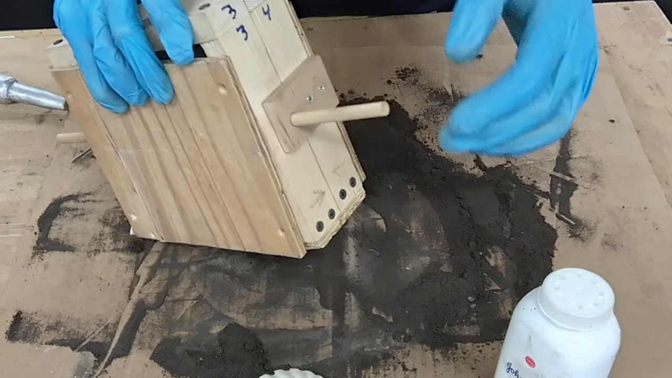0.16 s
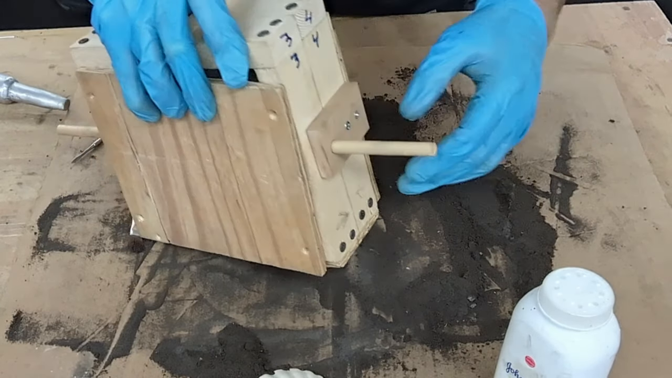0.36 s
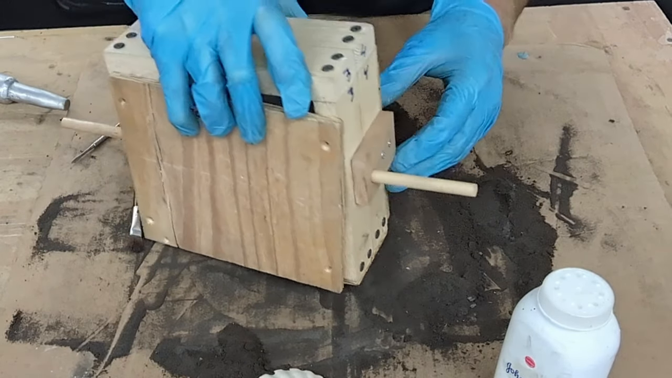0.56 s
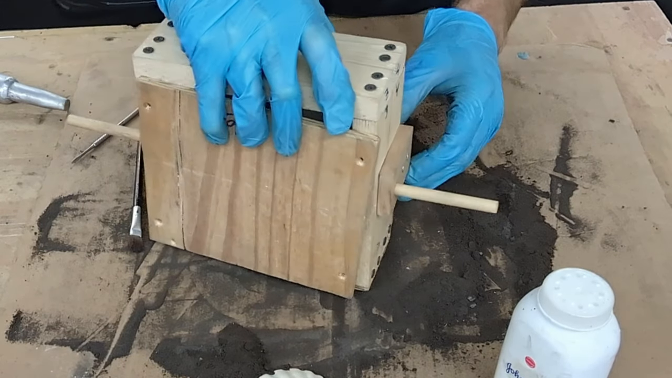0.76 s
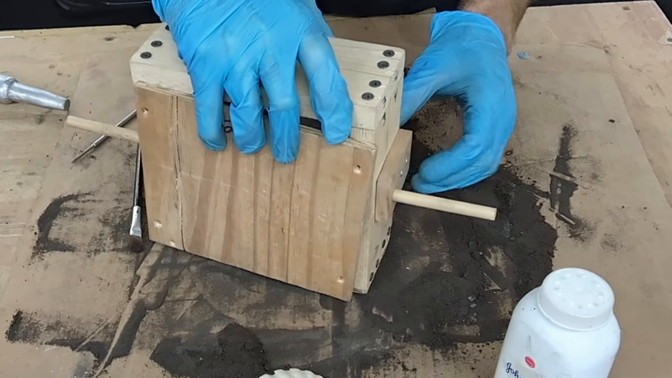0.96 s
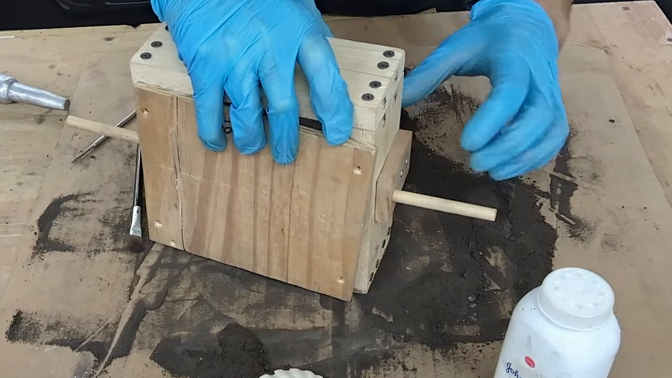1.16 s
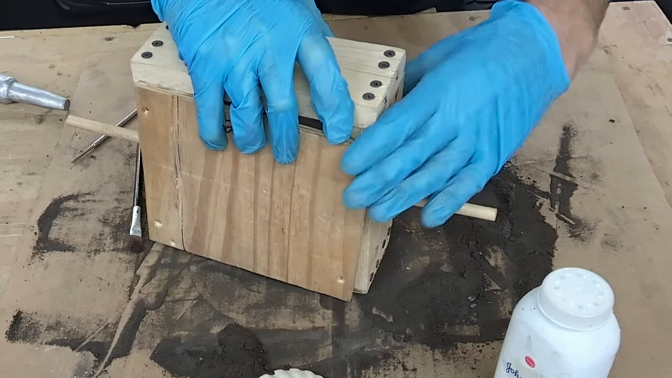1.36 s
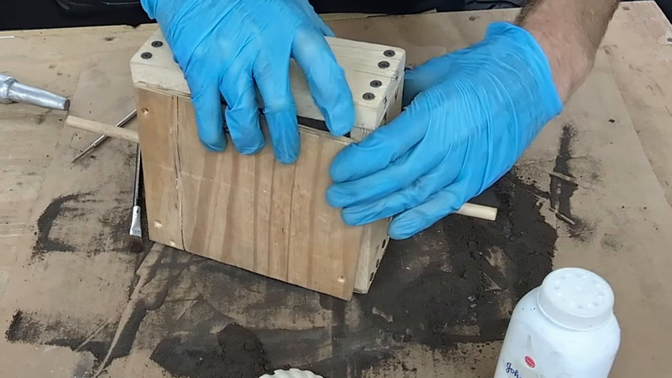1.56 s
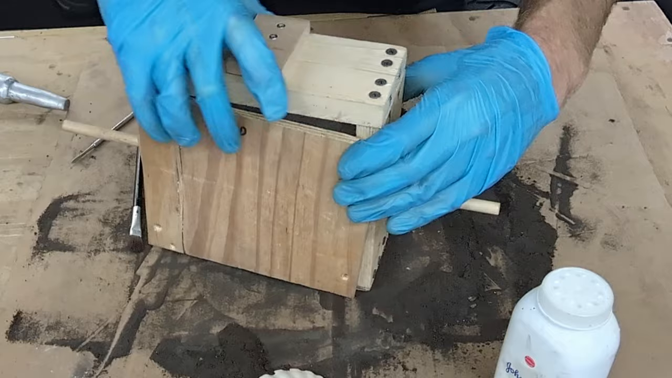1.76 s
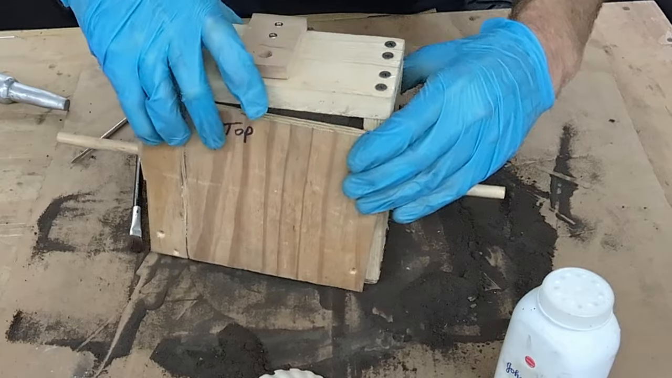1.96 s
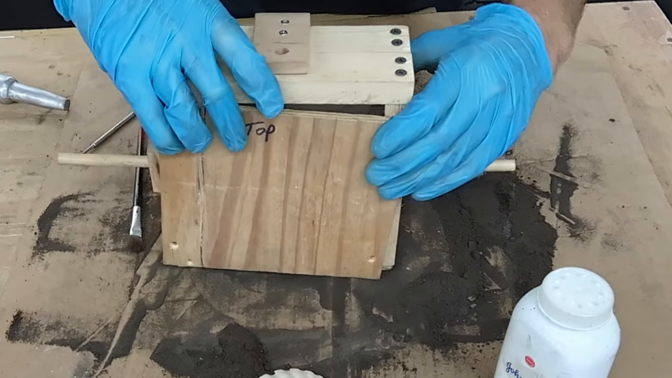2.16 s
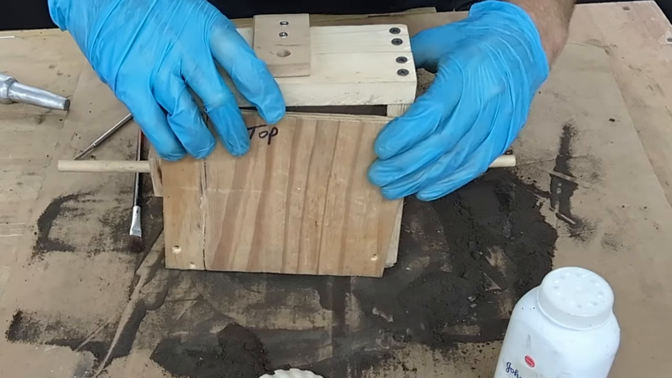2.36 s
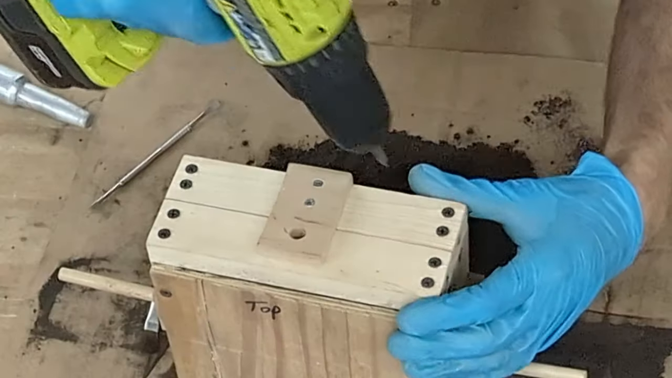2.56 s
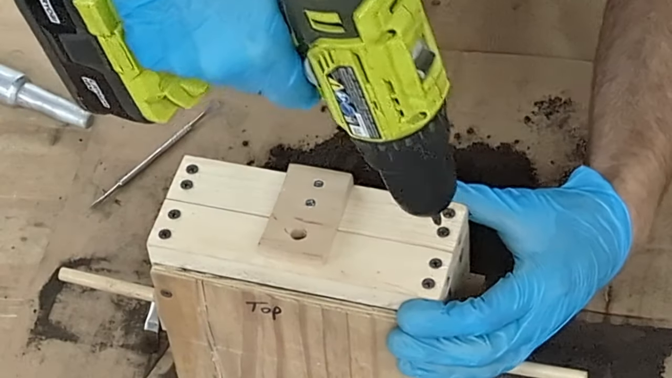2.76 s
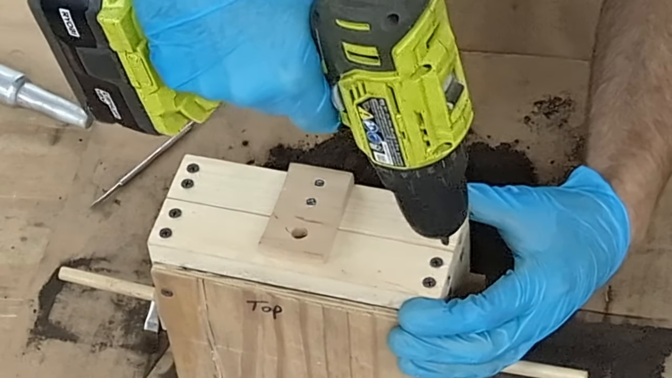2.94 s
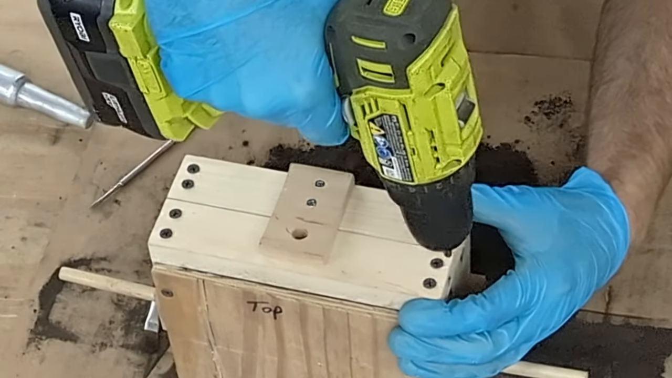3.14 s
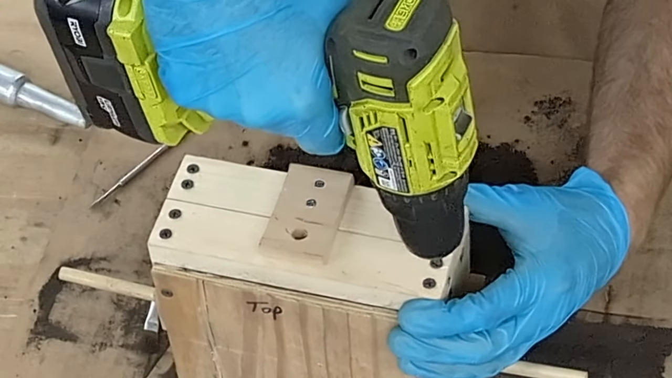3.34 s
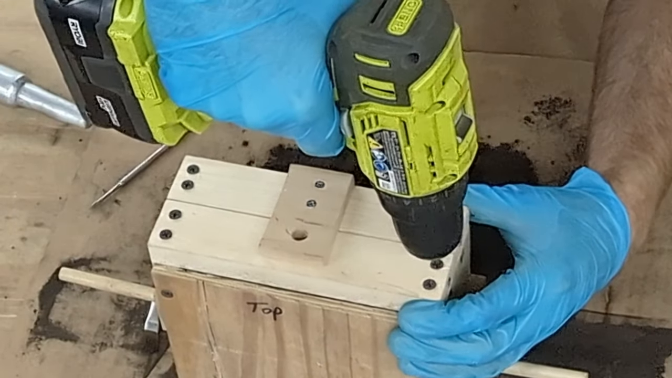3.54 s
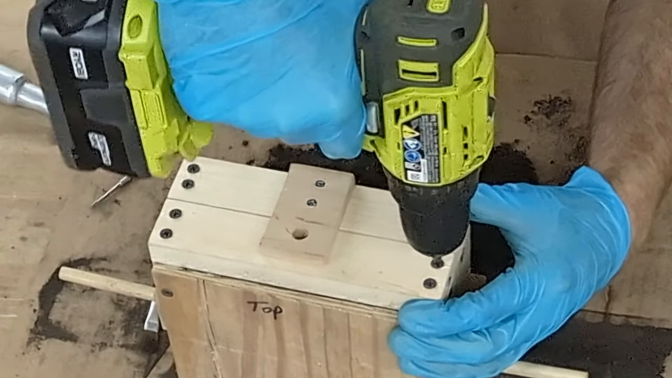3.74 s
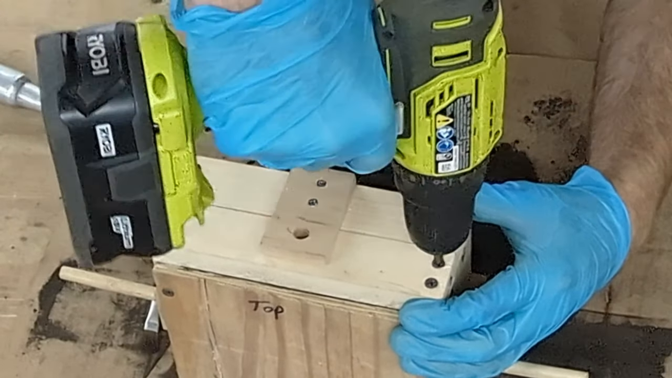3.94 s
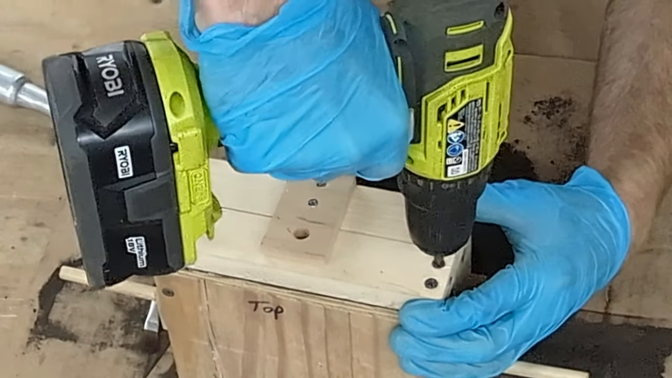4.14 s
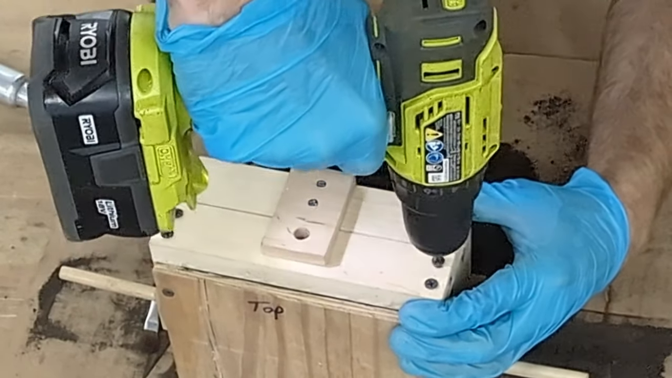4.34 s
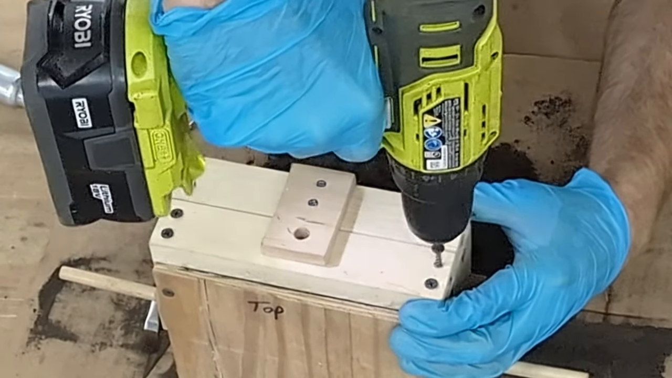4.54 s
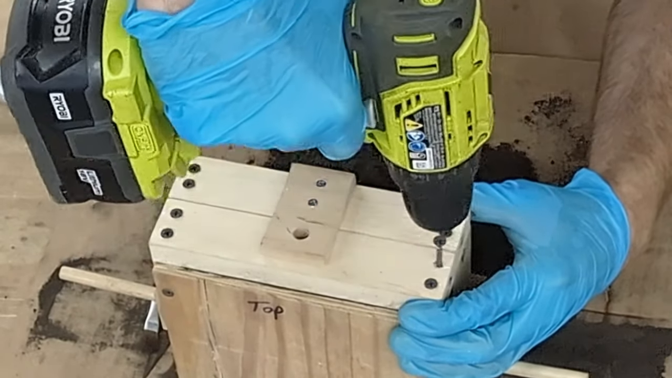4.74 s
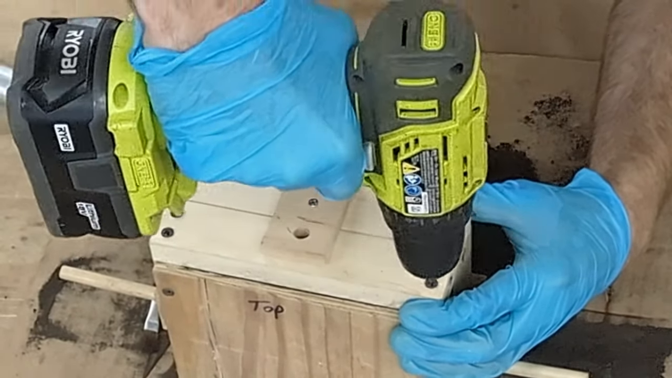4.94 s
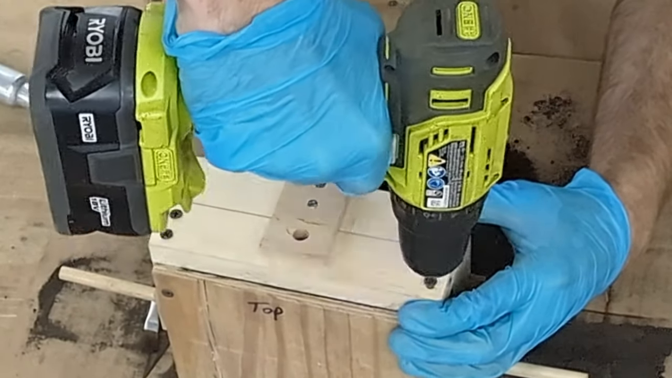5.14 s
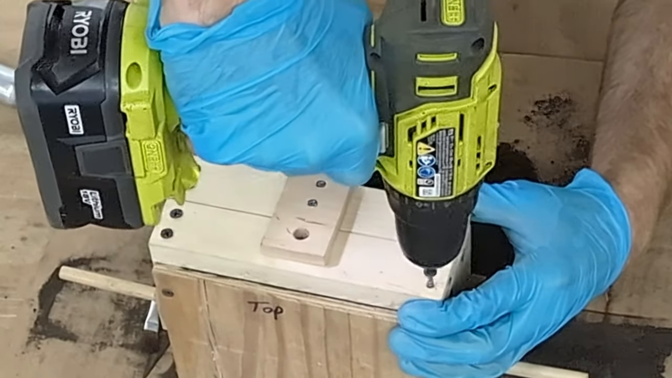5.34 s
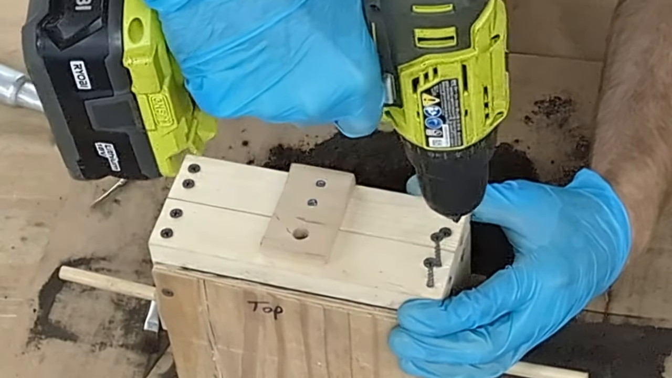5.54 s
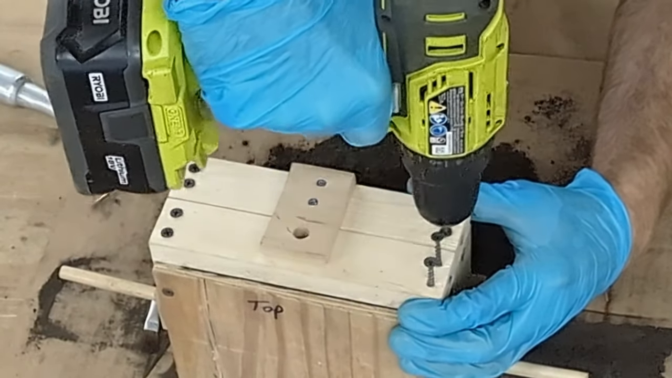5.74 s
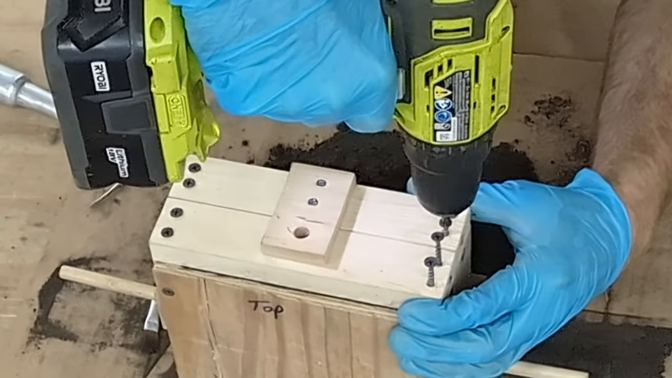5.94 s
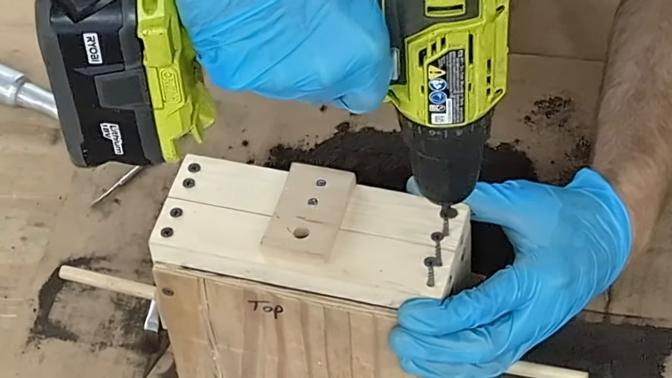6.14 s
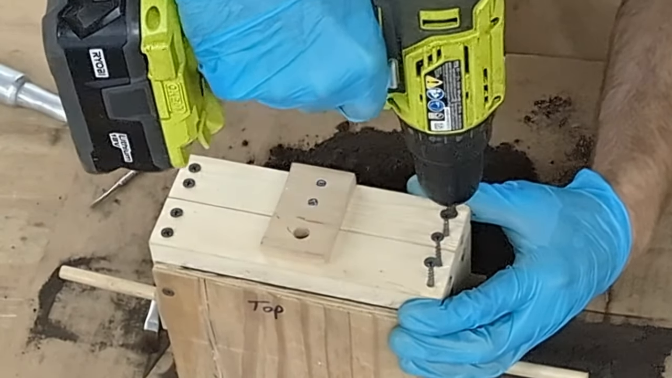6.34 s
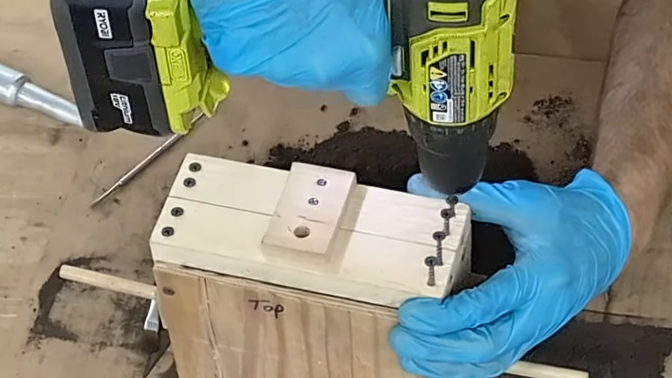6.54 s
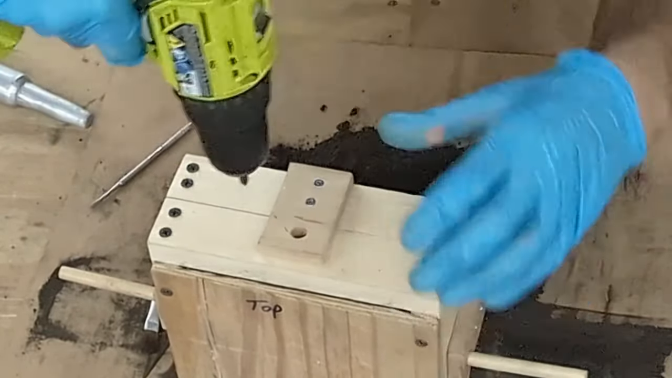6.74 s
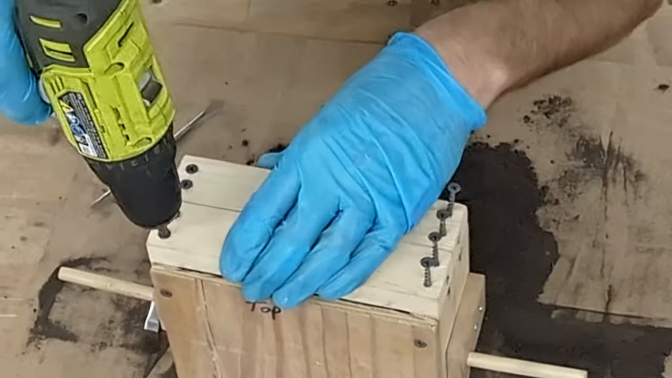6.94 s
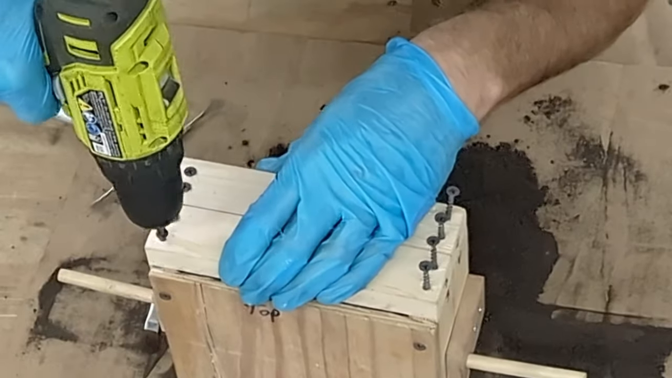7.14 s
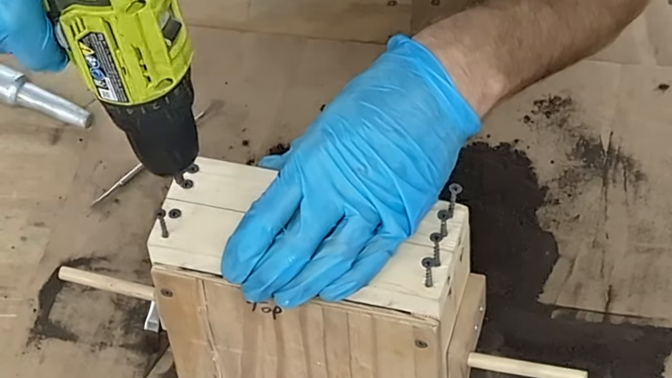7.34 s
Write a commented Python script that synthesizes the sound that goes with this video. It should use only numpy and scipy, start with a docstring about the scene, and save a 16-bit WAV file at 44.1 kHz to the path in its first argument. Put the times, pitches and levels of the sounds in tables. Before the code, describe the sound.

Gloved hands turn a hollow wooden box on a workshop bench with faint rustles, scrapes, ticks and soft knocks over low rumble and a distant hum. After sharper knocks and a thin trigger squeak, a cordless drill backs out screws in short rasping bursts with a high whine, the bit clacking into screw heads and the box booming. Close stereo microphone in a quiet, dry indoor space.

```python
"""First, gloved hands turn a hollow wooden box on a workshop bench: shaped noise rustles, scrapes and ticks,
knocks ring panel modes, over low rumble, a far machine's hum and faint air. Then a thin squeak at the trigger,
and a cordless drill backs screws out in short bursts: jolted noise rasps through housing resonances, gear tones
rise, the speed control whines beside its switching rate. Between and during the bursts the bit knocks into the
screw heads, and shuddering notes and struck modes make the box boom along."""
import sys
import numpy as np
from scipy import signal
from scipy.fft import rfft, irfft
from scipy.io import wavfile
from scipy.ndimage import uniform_filter1d

SR = 44100
rng = np.random.default_rng(int(sys.argv[2]) if len(sys.argv) > 2 else 0)


def unload_audio(sound):
    """Save the sound as a 16-bit wav file, at the path given as the first command line argument."""
    columns = np.transpose(np.atleast_2d(sound))
    # keep every value between -1 and 1, then stretch to whole-number steps
    steps = np.round(np.clip(columns, -1, 1) * 32767)
    wavfile.write(sys.argv[1], SR, steps.astype(np.int16))


N = 330353
T = np.arange(N) / SR
STEPS = T[::16]  # control times [s]


def gain_of(db):
    """Amplitude ratio of a level in dB."""
    return 10 ** (np.asarray(db) / 20)


def evened(x):
    """Scale to rms 1."""
    return x / np.sqrt(np.mean(x ** 2) + 1e-20)


def read(points, hz):
    """Curve through (frequency, value) points, linear over log frequency."""
    f, value = np.transpose(points)
    return np.interp(np.log(hz + 1), np.log(f + 1), value)


def track(table, axis, silent=None):
    """One table column over time; outside the table it holds, or takes the silent value."""
    s, value = np.array(table)[:, [0, axis]].T
    out = np.interp(T, s, value)
    if silent is None:
        return out
    inside = (T >= s[0]) & (T <= s[-1])
    return uniform_filter1d(np.where(inside, out, silent), size=300)


def smooth(control):
    """Control interpolated from STEPS to every sample."""
    return np.interp(T, STEPS, control)


def swell(s, rise_s, fade_s):
    """Gain that climbs 20 dB in rise_s up to the moment s and drops 20 dB in fade_s."""
    return gain_of(-20 * np.maximum((s - STEPS) / rise_s, (STEPS - s) / fade_s))


def bell(s, width_s):
    """Gaussian bump, peak 1, down to 1/e at width_s on either side."""
    return np.exp(-((STEPS - s) / width_s) ** 2)


def wobble(size):
    """Slow random curve of rms 1, smoothed twice over size samples."""
    return evened(uniform_filter1d(uniform_filter1d(rng.standard_normal(N), size), size))


def grit(per_s, spread_db, size):
    """Gain that jumps up at random instants and decays with a time constant of size samples."""
    jump = gain_of(spread_db * np.minimum(rng.exponential(1, N), 4))
    hits = (rng.random(N) < per_s / SR) * jump
    return 1 + signal.oaconvolve(hits, np.exp(-np.arange(4 * size) / size))[:N]


def resonate(x, hz, width_hz):
    """One resonance of gain 1: shift hz to zero, low-pass, shift back."""
    turn = np.exp(2j * np.pi * np.cumsum(hz * np.ones(N)) / SR)
    r = np.exp(-np.pi * width_hz / SR)
    return 2 * (turn * signal.lfilter([1 - r], [1, -r], x / turn)).real


# left-right likeness of noise: (frequency [Hz], correlation [0-1])
NOISE_LIKENESS = [(60, 0.9), (150, 0.94), (380, 0.69), (950, 0.18), (2400, 0.019), (15000, 0.014)]


def noise(shape, patchy_db, size=512):
    """Two-channel noise of a given spectrum with drifting patches, rms 1."""
    frames, hz = 4 * N // size + 5, np.fft.rfftfreq(size, 1 / SR)
    a, b, c, d, patches = rng.standard_normal((frames, len(hz), 5)).T
    patches = uniform_filter1d(patches, size=6, axis=0)
    patches = evened(uniform_filter1d(patches, size=10, axis=1))
    same = np.clip(read(NOISE_LIKENESS, hz), -1, 1)[:, None]
    left = a + 1j * b
    right = same * left + np.sqrt(1 - same ** 2) * (c + 1j * d)
    spectra = np.array([left, right]) * gain_of(read(shape, hz)[:, None] + patchy_db * patches)
    return evened(signal.istft(spectra, nperseg=size, noverlap=size * 3 // 4)[1][:, :N])


def sine(turns, offset_turns):
    """Sine of rms 1, second channel ahead by offset_turns."""
    return np.sqrt(2) * np.sin(2 * np.pi * (turns + np.array([[0], [offset_turns]])))


def tone(hz, waver_hz):
    """Slightly unsteady sine of rms 1, channels a quarter turn apart."""
    turns = np.cumsum(hz + waver_hz * wobble(size=300)) / SR + rng.random()
    return sine(turns, 1 / 4)


def add(mix, s, sound):
    """Add a sound into the mix at s seconds, cut at the end."""
    part = mix[:, max(round(s * SR), 0):][:, :sound.shape[1]]
    part += sound[:, :part.shape[1]]


def aftermath(t60_s):
    """Gain that follows every knock's boom and dies 60 dB in t60_s times its ring factor."""
    most_db = -38  # harder knocks leave no more
    return smooth(sum(gain_of(min(boom_db, most_db)) * swell(s + BOOM_DELAY_S, .02, stretch * t60_s / 3)
                      for s, _, boom_db, _, stretch, _ in KNOCK_HITS))


# rumble level before random swells: (time [s], level [dB])
RUMBLE_LEVEL = [(0.0, -57), (0.44, -60), (1.6, -57), (1.94, -62), (2.7, -64), (3.3, -67), (3.48, -58),
                (3.73, -69), (4.04, -59), (4.28, -60), (4.45, -93), (4.7, -89.5), (4.79, -74), (4.85, -103),
                (5.1, -76.5), (5.9, -73.5), (6.7, -78), (7.49, -87)]
# rumble spectrum: (frequency [Hz], relative density [dB per Hz])
RUMBLE_SPECTRUM = [(12, -45), (20, -30), (56, 4.5), (80, -7), (123, -17.5), (186, -24), (236, -34),
                   (258, -29), (327, -36), (400, -33), (520, -85.5), (880, -120)]
RUMBLE_SWELL_DB, THUMP_DB, THUMP_T60_S = 3.8, -21, .15  # thump relative to the capped boom


def rumble():
    """Low noise in random swells; each knock also thumps the bench."""
    lumps = noise(RUMBLE_SPECTRUM, patchy_db=1., size=2048)
    level = gain_of(track(RUMBLE_LEVEL, axis=1) + RUMBLE_SWELL_DB * wobble(size=2000))
    return lumps * (level + gain_of(THUMP_DB) * aftermath(THUMP_T60_S))


# far machine: (time [s], stroke rate [Hz], multiple 2 [dB], multiple 3 [dB])
HUM_STROKES = [(0.0, 25.62, -74.5, -55), (0.4, 25.48, -74, -56), (0.6, 24.92, -74, -58),
               (0.72, 25.3, -79, -62), (1.33, 24.71, -67, -51.5), (1.7, 24.84, -50.5, -61),
               (1.99, 24.86, -71, -85), (2.4, 25, -72, -66), (2.48, 24.9, -64.5, -64),
               (2.52, 24.9, -80, -81)]
# higher multiples, mean level: (multiple of stroke rate, level [dB])
HUM_MULTIPLES = [(5, -73.5), (7, -82.5)]


def far_hum():
    """Far machine: sines at multiples of a drifting stroke rate."""
    stroke = np.cumsum(track(HUM_STROKES, axis=1)) / SR
    heard = T < HUM_STROKES[-1][0]
    levels = [(k, gain_of(track(HUM_STROKES, axis=k, silent=-120))) for k in (2, 3)]
    levels += [(round(k), heard * gain_of(db + 4.4 * wobble(size=3000))) for k, db in HUM_MULTIPLES]
    return sum(sine(k * stroke + rng.random(), .08) * gain for k, gain in levels)


# air spectrum: (frequency [Hz], relative density [dB per Hz])
AIR_SPECTRUM = [(120, -33), (200, -1.5), (806, -5.5), (1160, -5.5), (2130, -11), (2510, -9), (8420, -17.5),
                (9400, -17), (16000, -26.5)]
# air level, one inner table: (time [s], level [dB])
AIR_LEVELS = [
    [(0, -78.5), (3.3, -89.5), (4.1, -90.5), (4.8, -90), (4.95, -93.5), (5.1, -87), (5.7, -83),
     (6.3, -81.5), (6.9, -80), (7.12, -77.5), (7.49, -78)],
]


def air():
    """Faint patchy broadband noise."""
    return noise(AIR_SPECTRUM, patchy_db=4.0) * gain_of(track(AIR_LEVELS[0], axis=1))


# strokes, and the dull noise tails of the knocks at 0.0 and 3.458 s:
# (loudest [s], 20 dB swell [s], 20 dB fade [s], rustle [dB], scrape [dB], swish [dB])
HAND_STROKES = [(0.0, .1, .2, -74, -61.5, -77), (0.6, 4.5, 4.5, -85, -82, -87),
                (0.765, .07, .08, -72, -92, -77), (0.891, .025, .045, -60, -83, -69),
                (1.46, 0.15, 0.4, -77.5, -80, -73), (1.638, .006, .08, -66, -73, -79),
                (1.755, 0.05, 0.3351, -56.5, -80, -58), (1.9, 0.16, 0.31, -65, -98, -60.5),
                (2.149, 0.34, 0.1783, -49.5, -67, -54), (2.284, .008, .09, -57, -74, -57),
                (2.42, 0.2, 0.18, -69.5, -80, -69.5), (2.635, .02, .07, -70, -82, -83),
                (2.79, .02, 0.34, -76.5, -82, -86), (3.458, .004, .15, -82, -53, -92),
                (4.103, 0.36, .02, -88, -77, -106), (4.177, 0.05, 0.18, -77, -69.5, -75)]
# spectra: (frequency [Hz], relative density [dB per Hz])
RUSTLE_SPECTRUM = [(710, -16), (1200, -4.5), (2110, 0), (2800, -0.5), (3770, 2.5), (4430, -3),
                   (6000, -13.5), (7800, -38), (13200, -120)]
SCRAPE_SPECTRUM = [(120, -63), (200, -11), (424, 16.5), (600, 15.5), (824, 13), (946, 7.5), (2500, -23),
                   (3250, -56), (5500, -120)]
SWISH_SPECTRUM = [(3240, -33), (5500, -3.5), (7970, -5), (9530, 1), (10700, -7.5), (12500, -3.5),
                  (15000, -16), (16000, -16.5)]


def hands():
    """Rubber on wood: grainy rustle and fine swish over a duller scrape, which also makes two knock tails."""
    slips = grit(per_s=79.0, spread_db=-3.0, size=60) * gain_of(2.03 * wobble(size=40))
    power = sum((gain_of(np.c_[dbs]) * swell(s, rise_s, fade_s)) ** 2
                for s, rise_s, fade_s, *dbs in HAND_STROKES)
    rustle_gain, scrape_gain, swish_gain = map(smooth, np.sqrt(power))
    rustle = evened(noise(RUSTLE_SPECTRUM, patchy_db=1.0) * slips) * rustle_gain
    swish = evened(noise(SWISH_SPECTRUM, patchy_db=1.5) * slips) * swish_gain
    scrape = noise(SCRAPE_SPECTRUM, patchy_db=3.) * scrape_gain
    return rustle + swish + scrape


# gloves, grit and metal, levels before the trims in ticks():
# (time [s], level [dB], pitch [Hz], t60 [s], snap over swish [dB])
SMALL_TICKS = [(0.7679, -49.5, 2500, 0.024, -10), (0.9003, -64.5, 3900, 0.028, -12),
               (1.4491, -56, 10100, 0.14, -7), (1.6337, -49.5, 1227, 0.033, -25),
               (1.75, -46, 9500, 0.071, -0.5), (1.7496, -44.5, 2290, 0.065, -6),
               (1.8716, -58, 1960, 0.051, 1), (1.8838, -39, 10000, 0.05, -5), (1.899, -46.5, 9500, 0.06, 0),
               (2.0541, -38.5, 3700, 0.052, 1), (2.064, -45, 3585, 0.052, -15),
               (2.1134, -36, 3910, 0.03, -14), (2.149, -51, 3066, 0.039, -11),
               (2.2812, -40.5, 9530, 0.026, -1), (2.4097, -32, 4000, 0.014, -6.5),
               (2.6, -61.5, 7660, 0.06, -8), (2.6273, -56, 2700, 0.086, -25),
               (2.7826, -57.5, 2280, 0.048, -9.5), (4.147, -65, 9400, 0.05, -12.5),
               (4.1769, -67, 9500, 0.042, -1), (4.2737, -40, 1290, 0.037, -5.5),
               (4.3179, -41, 1070, 0.17, -13), (5.288, -33.5, 9400, 0.052, -14)]


def ticks():
    """Small contacts: a sharp wideband snap and a short swish of noise around a pitch."""
    out, t = np.zeros((2, N)), np.arange(SR // 5) / SR
    wide = signal.butter(1, [2500, 10000], "bandpass", fs=SR)
    for s, db, hz, t60_s, snap_db in SMALL_TICKS:
        band = signal.butter(1, [hz * 0.75, min(hz * 1.12, SR * .45)], "bandpass", fs=SR)
        raw = rng.standard_normal((2, len(t)))
        swish = evened(signal.lfilter(*band, raw)) * (1 - np.exp(-t / 0.0023))
        snap = evened(signal.lfilter(*wide, raw))
        add(out, s, gain_of(db - 6.0 - 60 * t / t60_s) * swish)
        add(out, s, gain_of(db + snap_db + 2.0 - 60 * t / 0.0029) * snap)
    return out


def trigger_squeak():
    """Finger first touches the trigger: a decaying noise burst through a narrow high resonance."""
    out, t = np.zeros((2, N)), np.arange(SR // 5) / SR
    burst = rng.standard_normal((2, len(t))) * gain_of(-31.5 - 60 * t / 0.18)  # level before filtering
    add(out, 4.138, burst * (1 - np.exp(-t / 0.0019)))
    return resonate(resonate(out, 9300, 260), 9300, 260)


# box low modes, before stretch and chance: (frequency [Hz], relative level [dB], t60 [s])
BOX_MODES = [(128.3, 10, 0.061), (189.6, -2.5, 0.072), (218, 3.5, 0.079), (283, -9.5, 0.056),
             (312, -14, 0.067)]


def boom(stretch):
    """Low box modes swell softly and meet in one swing 40 ms in, peak 1."""
    t = np.arange(SR // 3) / SR - 1 / 25
    luck = rng.standard_normal((len(BOX_MODES), 3))
    out = 0
    for (hz, db, t60_s), (u, v, w) in zip(BOX_MODES, luck):
        level = gain_of(db + 1.3 * u - 60 * np.maximum(t / (t60_s * stretch), -t / 0.036))
        phase = 2 * np.pi * hz * (1 + 0.013 * v) * t + 0.13 * w * np.array([[1], [-1]])
        out = out + level * np.cos(phase)
    return out / abs(out).max()


# box panel modes, before stretch and chance: (frequency [Hz], relative level [dB], t60 [s])
PANEL_MODES = [(313, -6.5, 0.1), (448, 4.5, 0.062), (480, -9, .05), (584, 2.5, 0.066), (749, 4.5, 0.03),
               (770, -0.5, 0.035), (861, -3, 0.075), (977, -14.5, 0.012), (1187, -13, 0.047),
               (1416, -5, 0.035), (1584, -4, 0.019), (2120, -10, .02)]


def panel_ring(t, stretch):
    """Panel modes struck a little differently each time, peak 1."""
    luck = rng.standard_normal((len(PANEL_MODES), 3))
    out = 0
    for (hz, db, t60_s), (u, v, w) in zip(PANEL_MODES, luck):
        level = gain_of(db + 0.94 * u - 60 * t / (t60_s * stretch))
        phase = 2 * np.pi * hz * (1 + 0.043 * v) * t + 0.65 * w * np.array([[1], [-1]])
        out = out + level * np.sin(phase)
    out = out * (1 - np.exp(-t / 0.0013))
    return out / abs(out).max()


# box and bit knocks, levels before the trims in knocks():
# (time [s], clack [dB], boom [dB], click [dB], ring factor, lead-in re clack [dB])
KNOCK_HITS = [(0.009, -55, -56.5, -77, 1, -16), (1.751, -57, -68, -53, 1, -11),
              (3.001, -67, -64, -80, 0.73, -17), (3.449, -40.5, -47, -82, 0.74, -37),
              (3.469, -43.5, -52, -79, 0.86, -18), (4.046, -73, -54.5, -88, 0.85, -15),
              (4.79, -75, -57, -95, 0.7, -20), (4.99, -44, -46.5, -57.5, 0.92, -11),
              (5.021, -41.5, -51, -67, 0.69, -19), (5.09, -44.5, -45.5, -60, 1, -5),
              (5.173, -35, -29, -47, 0.5, -5), (5.191, -28, -23.5, -35, 1, -5),
              (5.288, -41, -47, -45, 0.9, -17), (5.755, -42, -39, -62, 0.55, -15.5),
              (5.791, -48, -41, -64, 0.74, -9.5), (6.383, -46, -54, -66, 0.79, -18),
              (6.395, -43.5, -43.5, -56, 0.7, -11.5), (6.427, -36, -43, -49, 0.54, -14.5),
              (6.528, -35, -30.5, -42, 0.97, -13), (6.714, -35.5, -62, -21, 0.8, -10),
              (6.991, -44, -41, -65, 0.58, -13.5), (7.009, -38.5, -50, -49.5, 0.49, -11),
              (7.062, -41.5, -43, -56, 1, -3), (7.185, -42.5, -47.5, -32, 0.51, -3)]
BOOM_DELAY_S = 0.00594


def knocks():
    """Soft noise lead-in before each blow, which rings the panels, thuds, clicks and booms in the box."""
    out, t = np.zeros((2, N)), np.arange(SR // 2) / SR
    dull = signal.butter(2, [300, 1400], "bandpass", fs=SR)
    bright = signal.butter(1, [1800, 5000], "bandpass", fs=SR)
    for s, clack_db, boom_db, click_db, stretch, lead_db in KNOCK_HITS:
        a, b = rng.standard_normal((2, 2, len(t)))
        grain, click = evened(signal.lfilter(*dull, a)), evened(signal.lfilter(*bright, b))
        lead = grain[:, :1300] * gain_of(clack_db + lead_db - 60 * t[1300:0:-1] / 0.036)
        add(out, max(s - 1300 / SR, 0), lead)
        add(out, s + BOOM_DELAY_S - 1 / 25, gain_of(boom_db + 3.0) * boom(stretch))
        thud = grain * gain_of(-13.0 - 60 * t / (0.17 * stretch))
        add(out, s, gain_of(clack_db - 3.5) * (panel_ring(t, stretch) + thud))
        click_fade = gain_of(-60 * t / 0.007) + gain_of(-15.5 - 60 * t / 0.058)
        add(out, s, click * gain_of(click_db - 6.5) * click_fade)
    return out


def running(start, stop, settle_db, coast_db_per_s, extra_db_per_s):
    """Gain of one pull: leap, settle, hold at 1, coast down."""
    rise_db_per_s, settle_s, knee_s = 2000, .014, .006  # last two are time constants
    after = np.maximum(STEPS - stop, 0)
    coast = after - knee_s * (1 - np.exp(-after / knee_s))
    rise_db = -rise_db_per_s * np.maximum(start - STEPS, 0)
    settling_db = settle_db * np.exp(-np.maximum(STEPS - start, 0) / settle_s)
    return gain_of(rise_db - settling_db - coast_db_per_s * coast - extra_db_per_s * after)


# (start [s], release [s], settling [dB], coasting [dB/s], rasp at start [dB], rasp at release [dB],
#  fizz re rasp [dB], rotor at start [Hz], rotor at release [Hz],
#  box low note [dB], box upper note [dB], growth of box notes [dB])
TRIGGER_PULLS = [(4.178, 4.184, 11, 300, -67, -70.5, -6, 392, 391, -65, -80, 0),
                 (4.272, 4.275, 8, 800, -65, -64.5, 6, 391, 391, -67, -68, 0),
                 (4.318, 4.332, 11, 450, -49, -48, -2.5, 395, 405, -52, -52.5, 0),
                 (4.384, 4.742, 9, 500, -41, -47, -3, 430, 386, -65, -67, 6),
                 (5.066, 5.158, 9, 460, -56.5, -55.5, -0.5, 328, 310, -66, -68, 0),
                 (5.168, 5.212, 9, 430, -32.5, -35.5, -4.5, 389, 389, -62, -62, 0),
                 (5.288, 5.556, 9, 480, -43, -45.5, -4.5, 388, 352, -58.5, -68.5, 0),
                 (5.838, 6.18, 11, 450, -44.5, -46, -4, 367, 362, -64, -69, 3),
                 (6.508, 6.72, 19, 390, -38.5, -38.5, -3, 345, 305, -56, -56, -4),
                 (7.184, 7.373, 11, 380, -36.5, -39.5, -3, 378, 336, -65.5, -58, 7)]


def motor(from_db, to_db, extra_db_per_s=0):
    """Gain over all pulls, each gliding between its two levels."""
    return smooth(sum(gain_of(np.interp(STEPS, row[:2], [a, b])) * running(*row[:4], extra_db_per_s)
                      for row, a, b in zip(TRIGGER_PULLS, from_db, to_db)))


# hollow note as the box is tipped onto the bench: (time [s], frequency [Hz], level [dB], t60 [s])
HOLLOW_NOTE = (0.036, 432, -58, 0.53)


def hollow_note():
    """One box resonance, a decaying sine."""
    s, hz, db, t60_s = HOLLOW_NOTE
    return np.sqrt(2) * np.sin(2 * np.pi * hz * T) * gain_of(db) * smooth(swell(s, 0.013, t60_s / 3))


# box shudder before the drilling, with the long ring of the knock at 3.45 s:
# (time [s], low note [dB], upper note [dB])
EARLY_SHUDDER = [(2.5, -70.5, -85), (2.9, -81, -84.5), (3.02, -68, -83), (3.3, -72, -84.5),
                 (3.442, -70, -85), (3.458, -53, -53), (3.75, -78, -85), (4.03, -58.5, -71),
                 (4.16, -69, -80.5), (4.3, -61, -56)]
# box notes: (frequency [Hz], width of first resonance [Hz])
SHUDDER_NOTES = [(132, 18), (222, 22)]
AFTER_DB, AFTER_T60_S = (-12, -14), .3  # low and upper note, relative to the capped boom
LINGER_DB, LINGER_FROM_S = (-84, -100), 5  # faint floor of low and upper note


def shaking():
    """Handling, motor and knocks set two notes of the hollow box shuddering: noise through paired resonances."""
    shudder = noise([(40, -1.5), (500, 7.5), (900, -42.0)], patchy_db=2.0, size=1024)
    out, after = 0, aftermath(AFTER_T60_S)
    for n, (hz, width_hz) in enumerate(SHUDDER_NOTES):
        note_db, growth_db = np.transpose(TRIGGER_PULLS)[[9 + n, 11]]
        level = gain_of(track(EARLY_SHUDDER, axis=n + 1, silent=-120))
        level = level + motor(note_db, note_db + growth_db)
        level = level + gain_of(AFTER_DB[n]) * after
        level = level + gain_of(LINGER_DB[n]) * (T > LINGER_FROM_S)
        note = evened(resonate(resonate(shudder, hz, width_hz), hz, 2 * width_hz))
        out = out + note * level * gain_of(3.0 * wobble(size=1500))
    return out


# spectra: (frequency [Hz], relative density [dB per Hz])
RASP_SPECTRUM = [(180, -35), (300, -13), (572, -6.5), (660, -8.5), (789, -9.5), (1290, -5), (1430, -4.5),
                 (1580, 0.5), (2860, -2.5), (3900, -0.5), (5200, -10), (6760, -37), (11400, -120)]
FIZZ_SPECTRUM = [(2820, -38), (4800, -4.5), (5750, -11), (7260, -2), (7400, -4), (8020, -2), (9520, -1),
                 (14800, -14.5), (15500, -14.5), (16000, -37)]
# drill housing: (frequency [Hz], width [Hz], relative level [dB])
HOUSING_MODES = [(903, 97, 0), (1268, 63, 4), (1544, 39, -1), (1830, 46, -4.5), (2130, 52, -2),
                 (2634, 30, -7), (3160, 140, -12.5), (3910, 110, -2.5)]
FIZZ_FALL_DB_PER_S = 90  # on top of coasting


def gear_rasp(teeth_hz, level):
    """Tooth impacts rasp through housing resonances; brushes and bearings fizz."""
    fizz_from_db, fizz_to_db = np.transpose(TRIGGER_PULLS)[[4, 5]] + np.transpose(TRIGGER_PULLS)[6]
    fizz_level = motor(fizz_from_db, fizz_to_db, FIZZ_FALL_DB_PER_S)
    throb = 1 + 0.26 * np.cos(2 * np.pi * np.cumsum(teeth_hz) / SR)  # one per tooth
    blows = throb * grit(per_s=72.0, spread_db=0.0, size=30)  # some harder
    flutter = gain_of(0.66 * wobble(size=30) + 0.28 * wobble(size=400))
    rasp = noise(RASP_SPECTRUM, patchy_db=1.0) * blows * flutter
    housing = sum(gain_of(db) * resonate(rasp, hz, width_hz) for hz, width_hz, db in HOUSING_MODES)
    fizz = evened(noise(FIZZ_SPECTRUM, patchy_db=2.0) * blows ** 0.66)
    return evened(rasp + 0.86 * housing) * level + fizz * fizz_level


# gears sing as the screw frees: (start [s], end [s], tooth rate from [Hz], to [Hz], bend exponent,
#  multiples 1, 2, 3, 1.2 re rasp [dB], before boosts)
MESH_RISES = [(4.379, 4.74, 627.5, 723, 0.88, -15, -14, -15, -30),
              (5.29, 5.58, 656.7, 713.7, 1.01, -17, -16.5, -20, -28),
              (5.85, 6.2, 530, 615, 1.26, -17, -21, -14, -28),
              (6.52, 6.73, 1225, 1402, 1.2, -12, -16, -33, -21),
              (7.185, 7.39, 885, 1167, 0.52, -11.5, -21, -21, -32)]
# mesh sings out: (time [s], 1/e half-width [s], boost of multiples 1, 2, 3, 1.2 [dB])
MESH_BOOSTS = [(4.402, .02, 8, 0, 5, 0), (4.465, .02, 9, 3, 0, 0), (4.66, .03, 4, 3, -6, 0),
               (5.345, .04, 9, 3, 0, 0), (5.95, .02, 3, -3, 7, 19), (6.1, .04, 11, 3, 3, 0),
               (6.55, .025, 3, 3, 0, 12), (6.68, .03, 3, -3, 0, 16), (7.25, .035, 0, 8, 12, 0)]
MESH_MULTIPLES = (1, 2, 3, 1.2)


def mesh_curves():
    """Tooth rate [Hz] and levels [dB] of its multiples, rising along each bent glide."""
    teeth_hz, orders_db = np.full(N, 600.), np.full((len(MESH_MULTIPLES), N), -120.)
    for a, b, from_hz, to_hz, bend, *dbs in MESH_RISES:
        on = T >= a
        part = np.clip((T[on] - a) / (b - a), 0, 1)
        teeth_hz[on] = from_hz + (to_hz - from_hz) * part ** bend
        orders_db[:, on] = np.c_[dbs] - 120 * (part == 1)  # silenced after the glide
    boosts_db = sum(np.c_[dbs] * bell(s, width_s) for s, width_s, *dbs in MESH_BOOSTS)
    return teeth_hz, orders_db + [smooth(v) for v in boosts_db]


def mesh_tones(teeth_hz, orders_db, level):
    """Meshing teeth: wavering sines at multiples of the tooth rate."""
    out = 0
    for k, db in zip(MESH_MULTIPLES, orders_db):
        gain = uniform_filter1d(gain_of(db + 2.5 * wobble(size=350)), size=300)
        out = out + tone(k * teeth_hz, waver_hz=4.97 * k ** 1.3) * gain
    return out * level


# whine flares, before the motor envelope: (time [s], 1/e half-width [s], lower [dB], upper [dB])
WHINE_FLARES = [(4.49, 0.032, -48.5, -56), (5.1, .04, -60, -58), (5.385, 0.015, -49, -58),
                (5.49, 0.074, -54, -56), (6.0, 0.036, -55.5, -67), (6.11, 0.037, -46, -50),
                (6.68, .015, -48, -70), (7.21, 0.018, -44, -70), (7.28, 0.029, -45, -65)]
SWITCH_HZ, WHINE_FALL_DB_PER_S = 8003, 500  # fall on top of coasting
WHINE_DB = (-17, -27)  # lower and upper whine re rasp, before wobble and motor envelope


def speed_whine(level):
    """Speed control: two sidebands, switching rate minus and plus rotor rate."""
    times_s = np.ravel([row[:2] for row in TRIGGER_PULLS])
    rotor_hz = np.interp(T, times_s, np.ravel([row[7:9] for row in TRIGGER_PULLS]))
    unity_db = np.zeros(len(TRIGGER_PULLS))
    switching = motor(unity_db, unity_db, WHINE_FALL_DB_PER_S)
    out = 0
    for n, (sign, waver_hz) in enumerate([(-1, 10.0), (1, 4.7)]):
        steady = level * gain_of(WHINE_DB[n] + 4.3 * wobble(size=400))
        flares = smooth(sum(gain_of(row[2 + n]) * bell(row[0], row[1]) for row in WHINE_FLARES))
        out = out + (steady + flares) * tone(SWITCH_HZ + sign * rotor_hz, waver_hz)
    return switching * out


def drill():
    """Gear rasp, mesh tones and whine under one motor envelope per pull."""
    level = motor(*np.transpose(TRIGGER_PULLS)[4:6])
    teeth_hz, orders_db = mesh_curves()
    return gear_rasp(teeth_hz, level) + mesh_tones(teeth_hz, orders_db, level) + speed_whine(level)


def scene():
    """Sum of all sources, background first."""
    background = rumble() + far_hum() + air()
    handling = hands() + ticks() + trigger_squeak()
    box = knocks() + hollow_note() + shaking()
    return background + handling + box + drill()


# channel colour: (frequency [Hz], left minus right [dB])
CHANNEL_LEAN = [(60, -0.5), (240, 0), (950, 0.0), (3770, -2), (15000, -1.5)]
BASS_CUT_HZ, EDGE_HZ = 69.8, 15900


def record(dry):
    """Channels differ a little in colour; deep bass is cut, then the top is band-limited."""
    hz = np.fft.rfftfreq(N, 1 / SR)
    lean_db = read(CHANNEL_LEAN, hz) / 2
    bass_cut = 1 / np.sqrt(1 + (BASS_CUT_HZ / (hz + 1)) ** 6)
    channels = irfft(rfft(dry) * gain_of([lean_db, -lean_db]) * bass_cut, N)
    low_pass = signal.firwin(511, EDGE_HZ, window=("kaiser", 9), fs=SR)
    return signal.oaconvolve(channels, low_pass[None], "same")


dry = scene()
out = record(dry)
unload_audio(out)
```